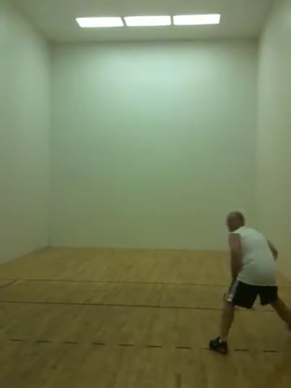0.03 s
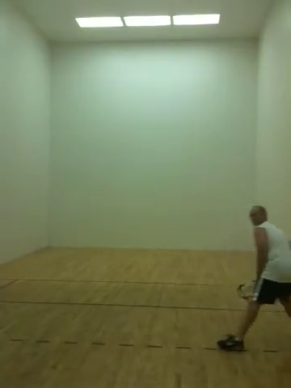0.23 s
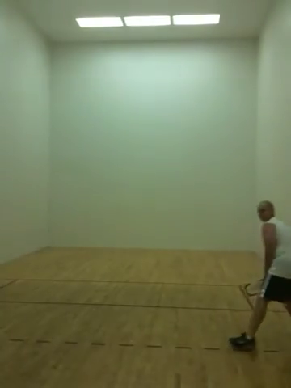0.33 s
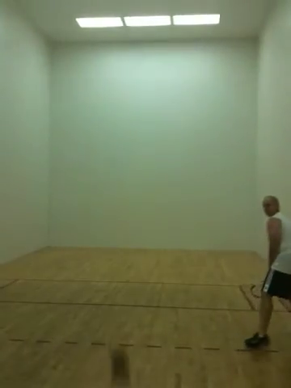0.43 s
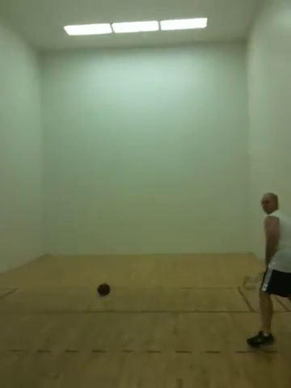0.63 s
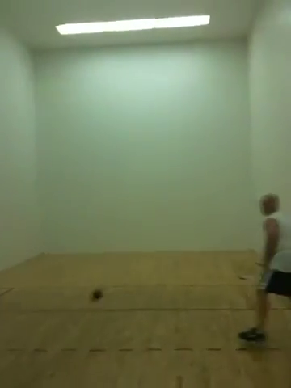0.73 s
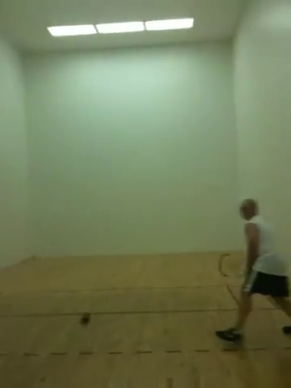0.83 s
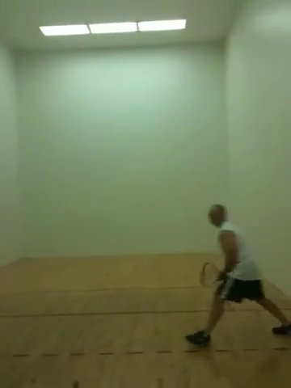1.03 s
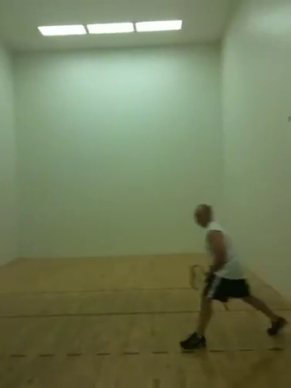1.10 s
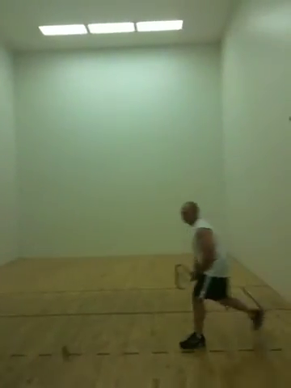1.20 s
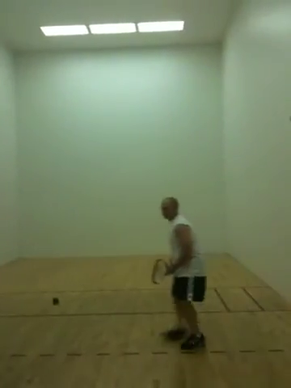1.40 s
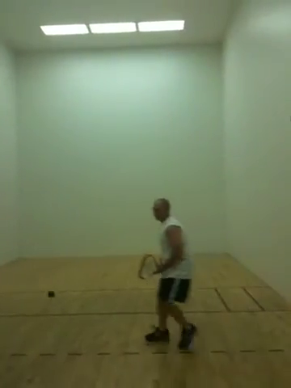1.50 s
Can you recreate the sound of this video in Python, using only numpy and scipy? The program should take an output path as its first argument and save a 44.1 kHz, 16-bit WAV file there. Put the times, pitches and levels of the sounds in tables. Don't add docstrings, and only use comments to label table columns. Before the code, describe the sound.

Ball impact booms through an indoor court wall, followed by a floor bounce, microphone buffeting and footsteps

```python
import sys
import numpy as np
from scipy import signal
from scipy.fft import rfft, irfft
from scipy.io import wavfile
from scipy.ndimage import uniform_filter1d

SR = 44100
rng = np.random.default_rng(int(sys.argv[2]) if len(sys.argv) > 2 else 0)


def persist_wave(psi):
    counts = np.round(np.clip(psi, -1, 1) * 32767).astype(np.int16)
    wavfile.write(sys.argv[1], SR, np.atleast_2d(counts).T)


def boost(x):
    u = np.asarray(x, float) / 20
    return 10 ** u


N = 68355
T = np.arange(N) / SR


def ring(x, modes):
    out = 0
    for hz, db, t60 in modes:
        pole = np.exp(2j * np.pi * hz / SR - np.log(1000) / (t60 * SR))
        out = out + boost(db) * signal.lfilter([1], [1, -pole], x).imag
    return out


def band(hz, width):
    b, a = signal.iirpeak(hz, hz / width, fs=SR)
    once = signal.lfilter(b, a, rng.standard_normal(N))
    x = signal.lfilter(b, a, once)
    return x / x.std()


def walk(rate):
    k = int(SR / rate)
    x = uniform_filter1d(uniform_filter1d(rng.standard_normal(N), k), k)
    return x / x.std()


def slow_air(order, hz):
    low = signal.butter(order, hz, fs=SR, output="sos")
    x = signal.sosfilt(low, rng.standard_normal(N))
    return x / x.std()


def push(at, ms):
    return np.sin(np.pi * np.clip((T - at) / ms * 1000, 0, 1)) ** 2


def bursts(table):
    out = 0
    for at, db, t60, hz, width in table:
        fade = boost(db - 60 * np.maximum(T - at, 0) / t60)
        onset = np.clip((T - at) / 0.0011, 0, 1)
        out = out + band(hz, width) * fade * onset
    return out


def bending(table):
    out = 0
    for at, db, hz, spread, t60 in table:
        u = np.maximum(T - at, 0)
        cycles = hz * u + spread * np.log1p(u / .0012)
        onset = 1 - np.exp(-u / .0012)
        out = out + boost(db - 60 * u / t60) * np.sin(2 * np.pi * cycles) * onset
    return out


# centre pitch in Hz, width in Hz, level in dB.
EARLIER = [(781, 150, -59.5), (990, 115, -62.5), (1660, 450, -74), (2460, 720, -72), (3910, 1400, -68),
           (7050, 3100, -74.5)]


def earlier_shot():
    t60_s = 2.98
    echoes = sum(boost(db + 2.4 * walk(60)) * band(hz, width) for hz, width, db in EARLIER)
    return boost(-60 * T / t60_s) * echoes


# pitch in Hz, level in dB per Hz.
AIR = [(300, 0.5), (500, -8), (800, -22), (1300, -24), (2000, -19), (4000, -19.5), (8000, -22),
       (16000, -26)]


def hiss():
    level_db = -67.5
    f = np.fft.rfftfreq(N, 1 / SR) + 1
    air = np.array(AIR)
    colour = boost(np.interp(np.log(f), np.log(air[:, 0]), air[:, 1]))
    x = irfft(rfft(rng.standard_normal(N)) * colour, N)
    return boost(level_db) * x / x.std()


def wind():
    wind_db, wind_hz, sway_db, sway_hz = -29, 23.9, 11, 45
    stir = slow_air(2, wind_hz)
    sway = slow_air(4, sway_hz)
    gusts = boost(2.5 * walk(25))
    return boost(wind_db) * gusts * (stir + boost(sway_db) * sway)


# pitch in Hz, width in Hz, level in dB.
LAMPS = [(1280, 23, -87.5), (1520, 25, -93), (1773, 20, -91.5), (2116, 22, -95.5), (2430, 24, -85.5)]


def lamps():
    return sum(boost(db + 2.3 * walk(6)) * band(hz, width) for hz, width, db in LAMPS)


# start in seconds, level in dB, last pitch in Hz, extra cycles, time to fade by 60 dB in seconds.
SINKS = [
    (.02, -33.4, 118, .074, .35),
    (1.0059, -26.5, 79.5, .322, .08),
    (1.0716, -13, 55.3, .086, .028),
]


def sinks():
    return -bending(SINKS)


# start in seconds, level in dB, time to fade by 60 dB in seconds, centre in Hz, width in Hz.
CRACKS = [(0.184, -42.5, 0.079, 960, 120), (0.186, -36, 0.54, 314, 88), (.184, -54, 0.095, 2600, 3100),
          (0.211, -45, 0.053, 3840, 1100), (0.21, -52.5, 0.21, 7000, 3300), (.2185, -34, 0.059, 670, 650),
          (0.25, -40, 0.052, 1210, 400), (.2395, -39, 0.059, 590, 400), (.238, -43.5, 0.054, 7400, 5700),
          (.238, -60, 0.076, 12000, 4000), (.24, -36, 0.21, 496, 126), (0.16, -69, 0.43, 730, 600),
          (.24, -63, 0.39, 3500, 2700), (.225, -20.5, 0.39, 188, 109), (0.73, -70, 0.021, 6400, 5600),
          (1.372, -48, 0.0081, 9400, 11000), (2.1, -67, 0.1, 760, 1200), (1.1, -66, .3, 600, 300),
          (0.66, -72.5, 2.1, 3800, 860), (0.67, -75, 1.7, 1610, 260), (.70, -87, .3, 4800, 1200),
          (.73, -70, 0.18, 7900, 3700), (1.4, -48, 0.53, 280, 58)]


def cracks():
    return bursts(CRACKS)


# start in seconds, peak level in dB, contact time in ms, direction of the push (1 or -1).
THUDS = [(0.211, -59, 1.2, -1), (.219, -26.5, 1.9, 1), (.2218, -40.5, 0.79, 1), (0.2393, -30.5, 1.9, 1),
         (0.527, -28, 7.94, 1), (0.554, -50, 5, 1), (0.565, -44.5, 6.1, 1), (.589, -49.5, 2.5, 1),
         (0.598, -42, 6.5, 1), (0.612, -39.5, 6.1, 1), (.712, -45.5, 6.7, 1), (0.731, -45, 3.2, 1),
         (.742, -42, 7.6, 1), (0.889, -39, 11, 1), (1.05, -57, 2.4, -1), (1.0704, -52, 0.95, 1),
         (1.1227, -64, 1, 1), (1.223, -39.5, 4, 1), (1.269, -50, 4.4, 1), (1.364, -40.5, 3.94, 1),
         (1.381, -42.5, 3.06, 1), (1.41, -45.5, 4.4, 1), (1.489, -51.5, 5.2, -1), (1.537, -41, 5, 1),
         (1.5492, -60, 0.2, -1), (1.0066, -64, 0.76, -1), (0.899, -48.5, 13, -1), (.955, -50, 7.4, 1),
         (1.156, -46, 10.8, 1), (1.477, -55.5, 3, 1)]

# pitch in Hz, level in dB, time to fade by 60 dB in seconds.
BOARDS = [(142.5, 1, 0.1), (181, 0.5, 0.066), (260, -5.5, 0.045), (301, 5.5, 0.03)]


def thuds():
    shove_db, boards_db = 14.0, -6.5
    force = sum(np.sign(sign) * boost(db + shove_db) * push(at, ms) for at, db, ms, sign in THUDS)
    return force + boost(boards_db) * ring(force / 100, BOARDS)


# start in seconds, level in dB, time to fade by 60
# dB in seconds, centre in Hz, width in Hz.
SCRAPES = [
    (.211, -44, 0.079, 1890, 1990),
    (.211, -48.5, 0.029, 4830, 500),
    (.586, -63, 0.22, 550, 403),
    (.86, -68, 0.44, 1090, 897),
    (1.42, -65, 2.8, 697, 220),
    (1.43, -77, 1.5, 1230, 350),
    (1.5485, -59, 0.041, 3000, 8000),
]


def scrapes():
    return bursts(SCRAPES)


# pitch in Hz, level in dB, time to fade by 60 dB in seconds.
PANEL = [(114.4, 4, 0.623), (114.4, -9, 0.18), (171.3, -12, 0.62), (176.5, 1.5, 0.57), (216.6, -4.5, 0.44),
         (258.8, -4, 0.67), (268, -11, 0.2), (313, -7.5, 0.64), (345, -6, 0.35), (400, -22, 0.24),
         (455, -1, 0.21), (537, -20, 0.18)]


def wall():
    slam_s, slam_db, slam_ms = .2135, -13, 4.42
    flutter_db, flutter_hz = 3, 45
    punch = (151.4, 4, 0.061)
    force = push(slam_s, slam_ms) / (slam_ms * SR / 2000)
    boom = sum(boost(flutter_db * walk(flutter_hz)) * ring(force, [mode]) for mode in PANEL)
    return boost(slam_db) * boom + ring(force, [punch])


# start in seconds, peak level in dB.
RATTLE = [(.2136, -39), (.2261, -27), (.2319, -38), (.2402, -36), (.2449, -41), (.249, -33), (.2523, -34),
          (.261, -39), (.2637, -40), (.2706, -34), (.2771, -44), (.2855, -40), (.2977, -43), (.3057, -42),
          (.3086, -44), (.3149, -57), (.341, -50), (.3501, -49), (.3854, -56), (.4061, -56), (.4211, -60),
          (.4295, -62)]

# pitch in Hz, level in dB, time to fade by 60 dB in seconds.
FITTING = [(5770, -1, 0.0063), (6740, 3, 0.0063), (7020, 1, 0.006), (9000, -7.5, 0.0051),
           (12800, -0.5, 0.001)]


def rattle():
    level_db, roughness = -12.5, 0.79
    ticks = np.zeros(N)
    for at, db in RATTLE:
        hits = np.array([2, 0, 0]) + roughness * rng.standard_normal(3)
        ticks[int(at * SR) + np.array([0, 5, 11])] = boost(db + level_db) * hits
    metal = ring(uniform_filter1d(ticks, size=2), FITTING)
    return signal.sosfilt(signal.butter(3, [4600, 13500], "band", fs=SR, output="sos"), metal)


# start in seconds, level in dB.
TAPS = [
    (.526, -23),
    (1.381, -46),
]

# pitch in Hz, level in dB, time to fade by 60 dB in seconds.
BALL = [(630, -6.5, 0.015), (1005, -9.5, 0.012), (1560, -14.5, 0.0091)]


def taps():
    tap_ms = 0.83
    force = sum(boost(db) * push(at, tap_ms) for at, db in TAPS) / (tap_ms * SR / 2000)
    return -ring(force, BALL)


# start in seconds, length in ms, speed at start and speed at end in full scale per second.
SWINGS = [(0.61254, 15.02, -13, 127), (0.63693, 6.77, -319, -102), (0.67163, 10.07, 495, 1),
          (0.69416, 10.64, -128, -35), (0.7502, 7.2, 0, -556), (0.7574, 3.0, -507, 158),
          (0.761, 1.76, -240, 828), (0.7653, 1.1, -1024, -1627), (0.77436, 4.11, 330, 476),
          (0.794, 9.07, -388, -27), (0.8024, 4.03, 4, 320), (0.80586, 1.97, 330, -394),
          (0.80793, 0.97, 387, -755), (0.8171, 2.8, 1214, -95), (0.82266, 1.01, -42, 1621),
          (0.82736, 1.01, -1456, -1484), (0.83363, 1.37, 996, 1007), (0.84807, 10.53, -532, -7)]


def draught():
    pinned_s = .03
    snap_s, snap = .6717, 0.034
    next_starts = [swing[0] for swing in SWINGS[1:]] + [9]
    travel, free = 0, np.ones(N)
    for (at, ms, v0, v1), next_start in zip(SWINGS, next_starts):
        end = at + ms / 1000
        u = np.clip((T - at) / ms * 1000, 0, 1)
        travel = travel + ms / 1000 * (v0 * u + (v1 - v0) * u * u / 2)
        if next_start - at - ms / 1000 < pinned_s:
            free[(T > end) & (T < next_start)] = 0
    return travel + snap * (T > snap_s), uniform_filter1d(free, size=9)


# start in seconds, level in dB, last pitch in Hz, extra cycles, time to fade by 60 dB in seconds.
HEELS = [
    (.7492, -23, 230, .4, .04),
    (1.3306, -13.5, 136, 0, .05),
    (1.4328, -22, 141, 0, .045),
    (1.5226, -15, 129, 0, .034),
]

LIFTS = [
    (1.2371, -16.5, 160, 0, .065),
    (1.2975, -31, 191, 0, .166),
]


def soles():
    soft = 40
    steps = bending(HEELS) - bending(LIFTS)
    return uniform_filter1d(uniform_filter1d(steps, size=soft), size=soft)


# start in seconds, level in dB, last pitch in Hz, extra cycles, time to fade by 60 dB in seconds.
KNOCKS = [
    (1.0741, -21.8, 67.5, .434, .054),
    (1.1224, -26.6, 118, .116, .1),
    (1.1972, -33.5, 202, .281, .064),
]


def knocks():
    return bending(KNOCKS)


def scene():
    travel, free = draught()
    hits = rattle() + cracks()
    floor = thuds() + taps() + knocks() + sinks() + soles()
    background = earlier_shot() + hiss() + wind() + lamps()
    sound = hits + floor + background + scrapes() + wall()
    followed = np.cumsum(np.diff(sound, prepend=sound[0]) * free)
    return (followed + travel)[None]


def roll_off(x):
    return signal.sosfilt(signal.butter(12, 16510, fs=SR, output="sos"), x)


def record(dry):
    x = signal.sosfilt(signal.butter(4, 167, "high", fs=SR, output="sos"), dry)
    x = signal.sosfilt(signal.ellip(8, .2, 30, 15600, fs=SR, output="sos"), x)
    return roll_off(x)


dry = scene()
out = record(dry)
persist_wave(out)
```